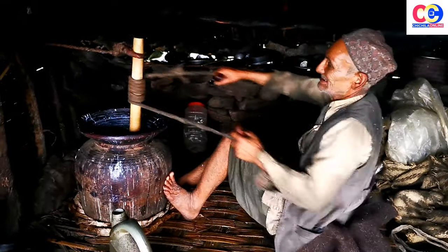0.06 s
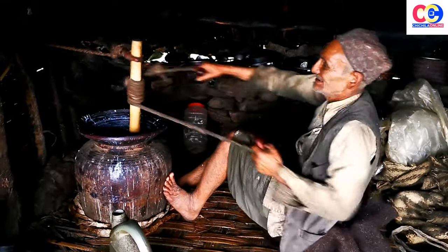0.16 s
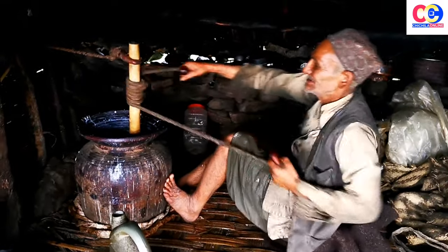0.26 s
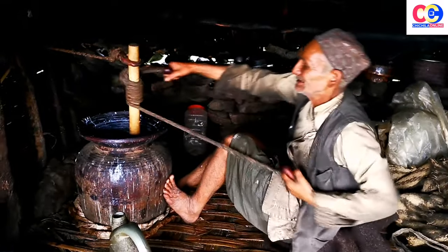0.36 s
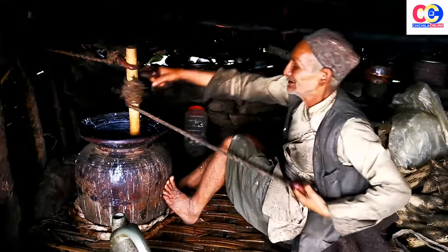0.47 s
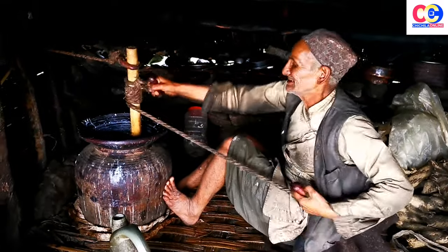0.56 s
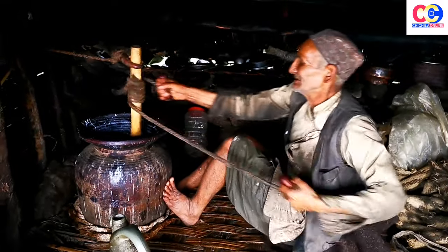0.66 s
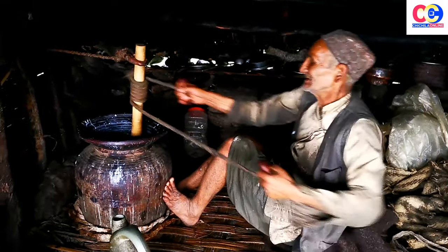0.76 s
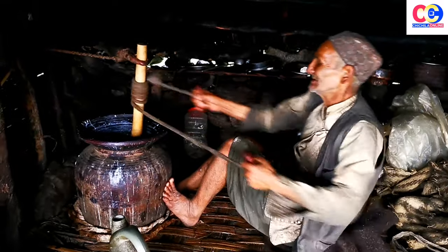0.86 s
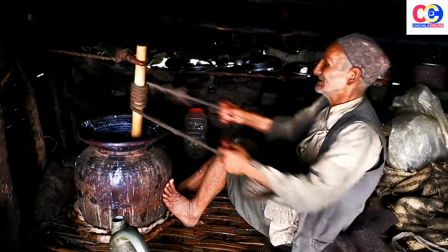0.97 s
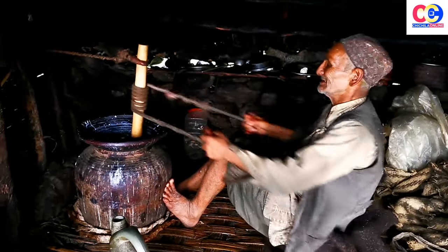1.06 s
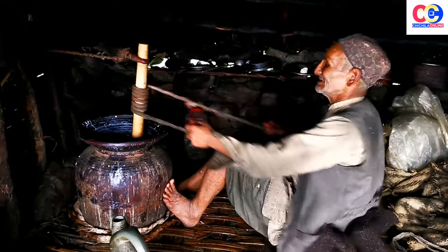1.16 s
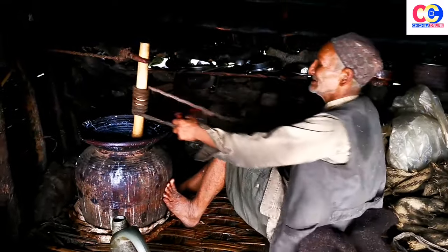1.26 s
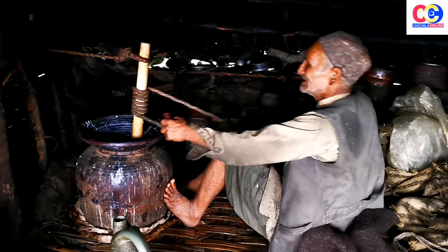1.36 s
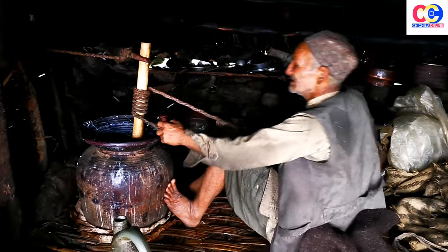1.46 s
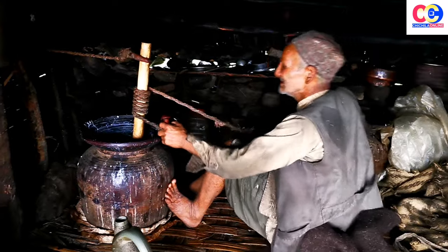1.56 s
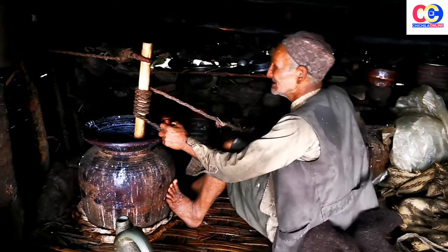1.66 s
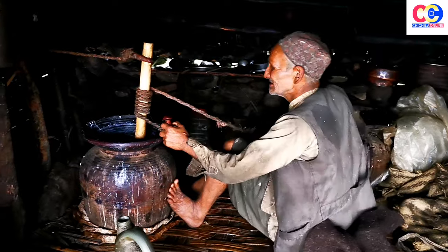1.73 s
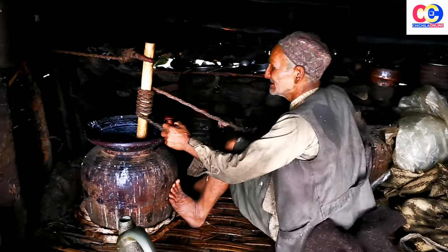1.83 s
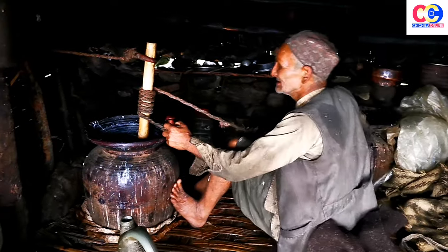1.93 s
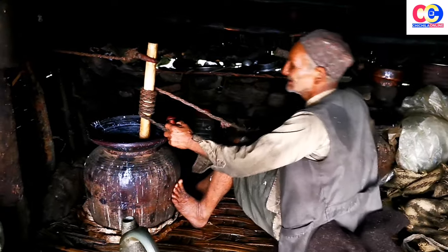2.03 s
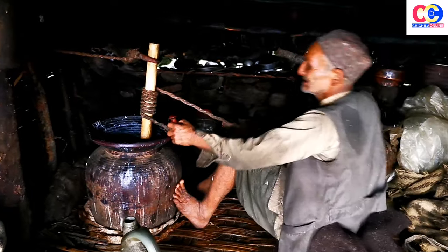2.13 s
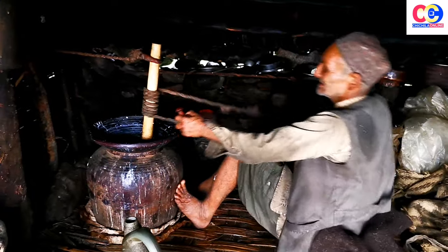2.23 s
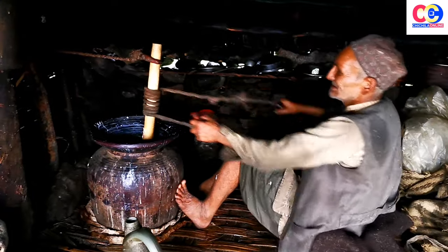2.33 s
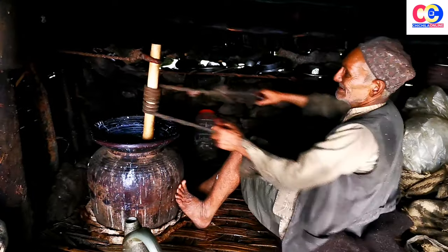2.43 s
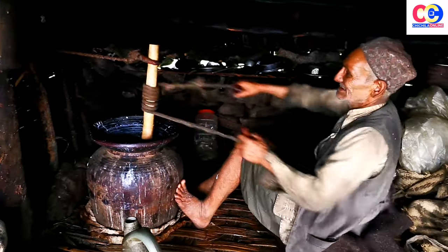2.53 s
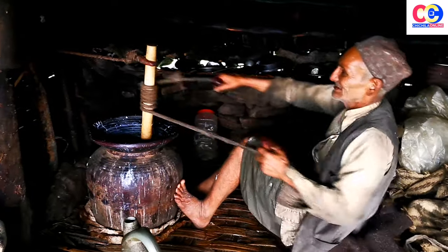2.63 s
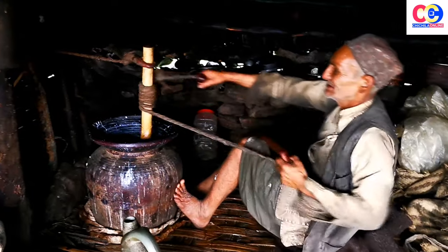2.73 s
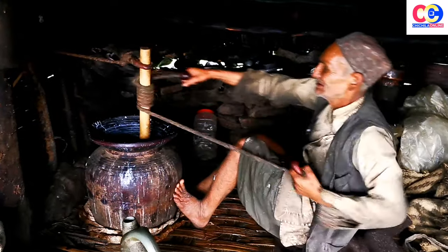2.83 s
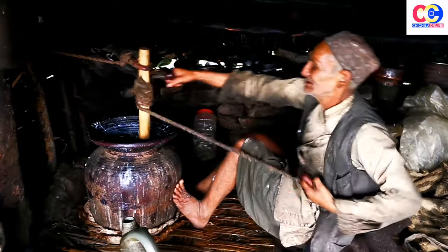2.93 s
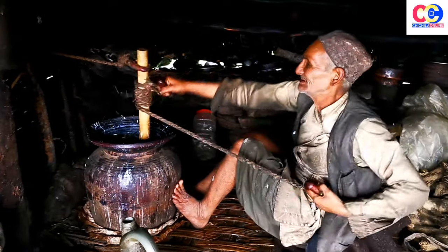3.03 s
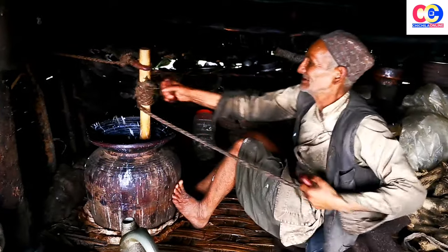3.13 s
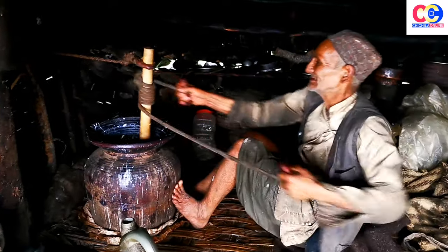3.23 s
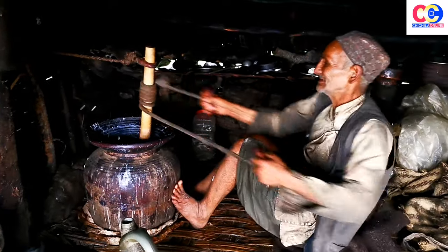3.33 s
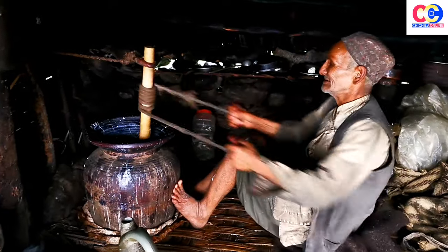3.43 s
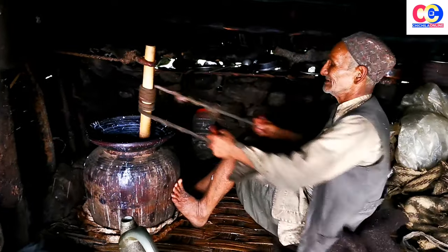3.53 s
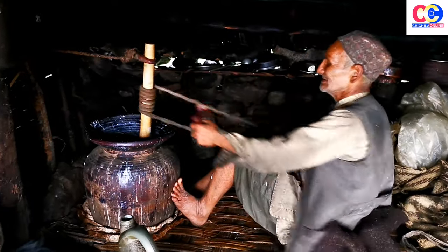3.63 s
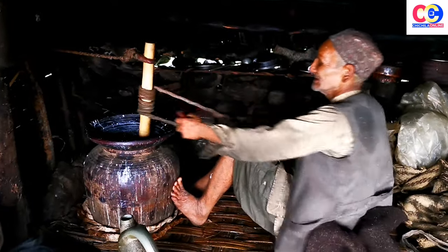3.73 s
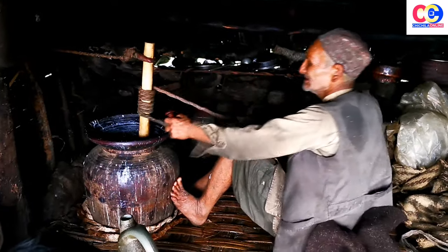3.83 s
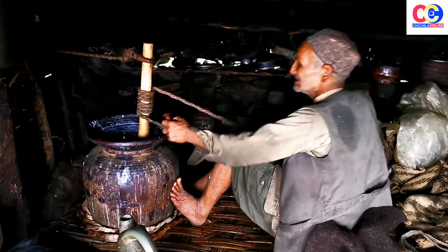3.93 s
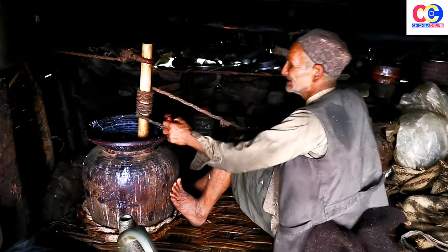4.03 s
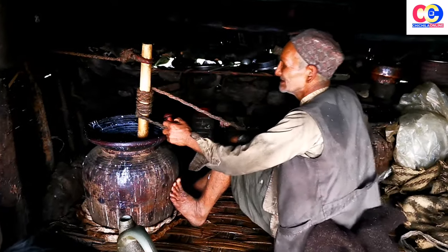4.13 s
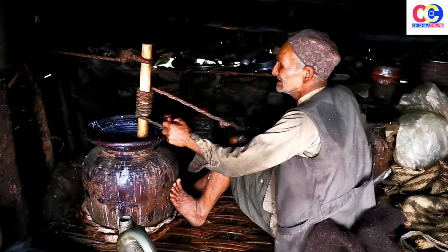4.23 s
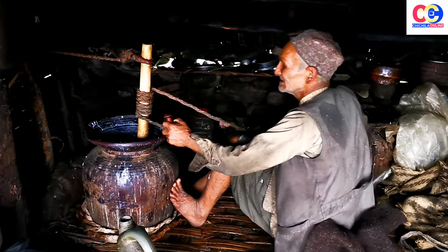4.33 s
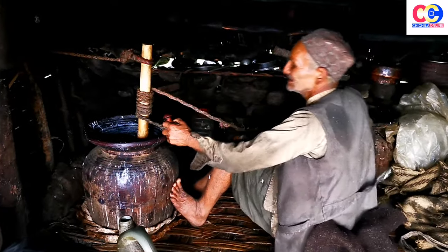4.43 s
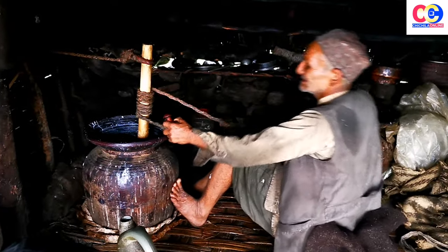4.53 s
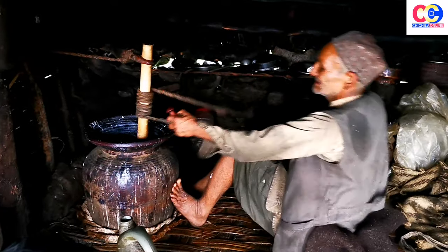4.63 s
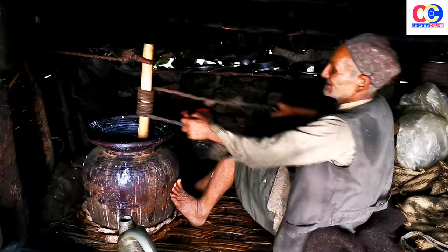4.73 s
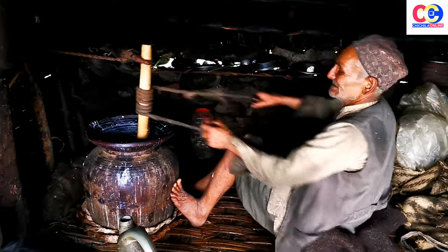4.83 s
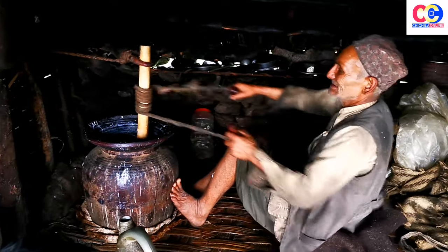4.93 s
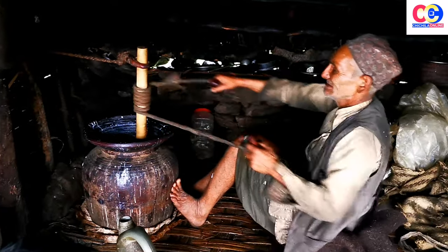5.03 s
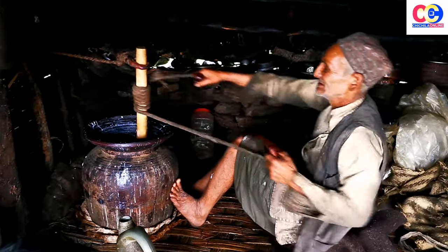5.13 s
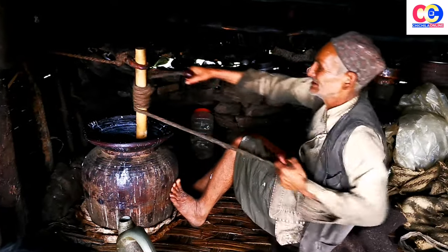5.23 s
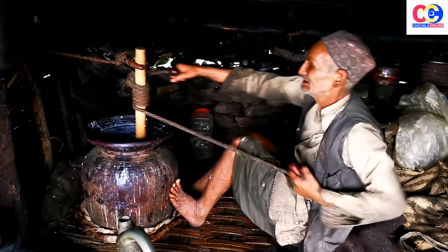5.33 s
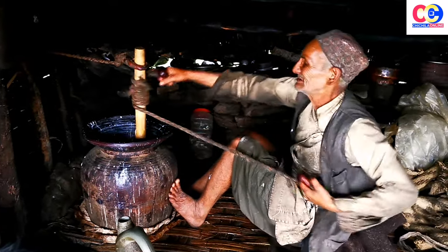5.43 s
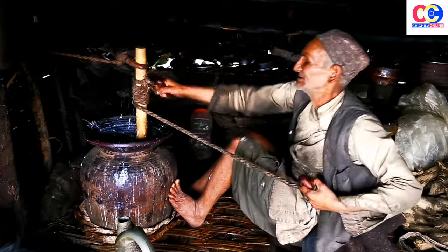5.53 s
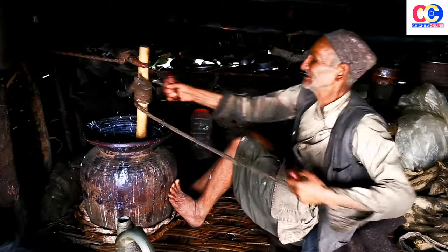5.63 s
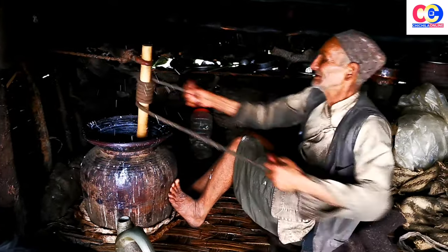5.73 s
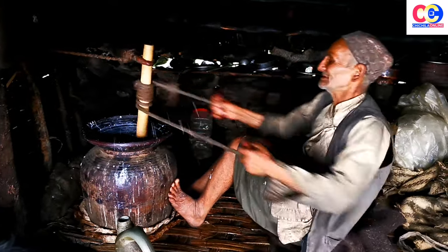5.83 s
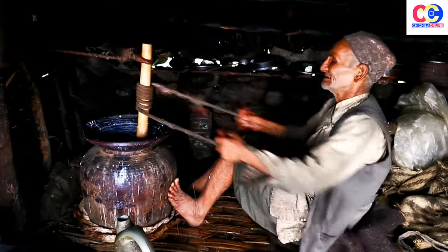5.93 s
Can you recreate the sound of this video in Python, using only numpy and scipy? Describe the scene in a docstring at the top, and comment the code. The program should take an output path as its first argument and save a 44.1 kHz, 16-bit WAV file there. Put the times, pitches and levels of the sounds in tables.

```python
"""A slap and a burst of gurgling open the scene: a rope-spun wooden paddle churns curd in a big clay pot.
It works in surges with rests between, inside a quiet shed. Air pockets are short sine bubbles that ring the
air in the pot; slaps and spray are shaped, patchy noise; the rocking and thuds are low bubbles; drops are clicks
with a short ring. Close microphones hear it from the left, with a thin whistle and the shed's hum and hiss behind."""
import sys
import numpy as np
from scipy import signal
from scipy.fft import rfft, irfft, next_fast_len
from scipy.io import wavfile
from scipy.ndimage import uniform_filter1d

SR = 44100
rng = np.random.default_rng(int(sys.argv[2]) if len(sys.argv) > 2 else 0)


def unload_audio(sound):
    """Save the sound as a 16-bit wav file, at the path given as the first command line argument."""
    columns = np.transpose(np.atleast_2d(sound))
    # keep every value between -1 and 1, then stretch to whole-number steps
    steps = np.round(np.clip(columns, -1, 1) * 32767)
    wavfile.write(sys.argv[1], SR, steps.astype(np.int16))


N = 264211


def gain_of(db):
    """Turns decibels into a factor."""
    return 10 ** (np.asarray(db) / 20)


def evened(x):
    """Scales a sound to rms 1."""
    return x / np.sqrt(np.mean(x ** 2) + 1e-20)


def add(mix, s, sound):
    """Mixes a sound in at s seconds."""
    part = mix[max(round(s * SR), 0):][:len(sound)]
    part += sound[:len(part)]


def colour(x, points, share=1):
    """Filters by a curve of (f/Hz, level/dB) points, of which share is applied."""
    size = next_fast_len(x.shape[-1])
    f, db = np.transpose(points)
    hz = np.fft.rfftfreq(size, 1 / SR)
    curve_db = np.interp(np.log(hz + 1), np.log(f + 1), db)
    return irfft(rfft(x, size) * gain_of(share * curve_db), size)[..., :x.shape[-1]]


def ring(x, modes):
    """Adds up resonances (f/Hz, width/Hz, level/dB), neighbours in opposite phase."""
    out = np.zeros(len(x))
    for k, (hz, width, db) in enumerate(modes):
        sign = (-1) ** k
        out += sign * gain_of(db) * signal.lfilter(*signal.iirpeak(hz, hz / width, SR), x)
    return out


def bubble(hz, length, glide, phase, rounded=1):
    """A pocket of air: a sine with a soft start, a peak near 1 and a pitch that glides up (down if glide < 0)."""
    u = np.arange(round(5 * length * SR) + 2) / SR / length  # time counted in lengths
    swell = (np.e * 3 * u * np.exp(-3 * u)) ** rounded
    cycles = hz * length * u * (1 + glide * u)
    return swell * np.sin(2 * np.pi * (cycles + phase))


def grains(lo_hz, hi_hz, per_s, cycles, spread_db, count, glide=0.013):
    """A swarm of bubbles of many sizes, a few of them loud; thick curd hardly lets their pitch rise."""
    out = np.zeros(N)
    for hz in np.geomspace(lo_hz, hi_hz, count):
        starts = rng.random(N) < per_s / count / SR
        train = starts * gain_of(spread_db * np.minimum(rng.exponential(1, N), 4))
        grain = bubble(hz, cycles / hz, glide, rng.random()) * np.sqrt(hz)
        out += signal.oaconvolve(train, grain)[:N]
    return evened(out)


def spread(shape, apart):
    """Noise from a wide surface: a part that both microphones share and a part of their own."""
    shared, left, right = rng.standard_normal((3, *shape))
    return shared + apart * np.array([left, right])


def mottled(x, patchy_db, flutter_db):
    """Curd breaks into blobs: patches of the spectrum, narrow and wide, swell for a few hundredths of a second."""
    z = signal.stft(x, nperseg=512, noverlap=384)[2]
    fine, wide = rng.standard_normal((2, *z.shape[1:]))
    fine = evened(uniform_filter1d(uniform_filter1d(fine, size=3, axis=0), size=6, axis=1))
    wide = evened(uniform_filter1d(uniform_filter1d(wide, size=24, axis=0), size=8, axis=1))
    field = gain_of(patchy_db * fine + flutter_db * wide)
    return signal.istft(z * evened(field), nperseg=512, noverlap=384)[1][:, :x.shape[1]]


# pulls on the rope: [t/s at full spin, level/dB, paddle starts t/s before, full spin lasts t/s,
# curd swings back after t/s, paddle stops after t/s, push on the pot level/dB]
ROPE_PULLS = [(0.08, -2, .2, 0.053, 0.37, 0.52, 0), (0.96, -0.5, 0.24, 0.13, 0.33, 0.48, 2),
              (2.553, -2, 0.15, 0.074, 0.32, 0.5, -3), (3.411, -1.5, 0.15, 0.077, 0.52, 0.55, 5),
              (4.98, -2.5, 0.23, 0.054, 0.52, 0.57, 0.5), (5.848, 0.5, 0.17, 0.048, .35, .5, 4.5)]
# how gurgle, spray and heave (one row each) follow a pull: [level/dB at full spin, start level/dB against full spin,
# rise dB per s, sag level/dB, sag t/s, swing-back level/dB, settling dB per s, share of the push 0-1]
LAYER_FOLLOWS = [(-32, -25, 222, 14.5, 0.16, 4.5, 111, 0.31), (-34, -17, 145, 20, 0.17, 0.5, 73, 0),
                 (-41, -17.5, 140, 10, 0.11, 6, 174, 0.85)]
SWING_S, START_DB_PER_S = 0.043, 408  # half-width of the swing-back (to 1/e), climb as the paddle starts


def surge(row):
    """Each pull stirs, spins the curd up, sags to a plateau, swings back once and settles; pulls add in power."""
    top_db, start_db, rise, sag_db, sag_s, swing_db, settle, share = LAYER_FOLLOWS[row]
    t, power = np.arange(0, N + 64, 64) / SR, 0
    for s, db, lead, hold, back, stop, push_db in ROPE_PULLS:
        u = t - s
        starting = start_db + START_DB_PER_S * np.minimum(u + lead, 0)
        level = np.maximum(rise * np.minimum(u, 0), starting)
        level -= sag_db * (1 - np.exp(-np.maximum(u - hold, 0) / max(sag_s, .01)))
        level += swing_db * np.exp(-((u - back) / SWING_S) ** 2)
        level -= settle * np.maximum(u - stop, 0)
        power = power + gain_of(level + db + share * push_db) ** 2
    return gain_of(top_db) * np.interp(np.arange(N) / SR, t, np.sqrt(power))


# big air pockets that collapse: [t/s, 3 ms after the start; level/dB before the pot; f/Hz; length t/s, swell peaks at 1/3]
BIG_POCKETS = [(0.079, -27.5, 275, 0.013), (0.083, -27.5, 1072, 0.021), (0.116, -24.5, 323, 0.024),
               (0.147, -16.5, 433, 0.0089), (0.215, -25, 340, 0.01), (0.265, -33.5, 335, 0.024),
               (0.388, -32, 413, 0.014), (0.441, -31.5, 335, 0.032), (0.508, -21, 478, 0.0088),
               (0.555, -36.5, 336, 0.02), (0.645, -26, 355, 0.024), (0.787, -36.5, 345, 0.03),
               (0.882, -37, 456, 0.059), (0.93, -29.5, 317, 0.02), (1.068, -21.5, 559, 0.011),
               (1.145, -26, 432, 0.028), (1.181, -20.5, 343, 0.023), (1.357, -35.5, 576, 0.012),
               (1.393, -23.5, 343, 0.022), (1.454, -25.5, 355, .012), (1.546, -46.5, 520, 0.012),
               (2.162, -54, 970, 0.0064), (2.408, -36.5, 1006, 0.013), (2.492, -33.5, 430, 0.045),
               (2.494, -30, 1544, 0.023), (2.577, -32, 634, 0.014), (2.631, -21.5, 544, 0.014),
               (2.642, -20, 326, 0.027), (2.683, -31, 336, 0.038), (2.728, -26.5, 658, 0.017),
               (2.782, -25, 933, 0.013), (2.933, -25.5, 341, 0.015), (2.937, -29.5, 1040, 0.021),
               (3.045, -24, 328, 0.015), (3.092, -44, 895, 0.025), (3.271, -25, 328, 0.0091),
               (3.325, -36.5, 660, 0.01), (3.389, -27.5, 276, 0.041), (3.416, -26, 251, 0.015),
               (3.722, -33.5, 960, 0.01), (3.828, -24.5, 482, 0.011), (3.889, -31.5, 352, 0.033),
               (3.941, -23, 328, 0.025), (3.986, -40.5, 923, 0.021), (4.045, -41.5, 906, 0.013),
               (4.086, -45, 708, 0.014), (4.089, -45, 1280, 0.022), (4.092, -43, 2130, 0.011),
               (4.135, -49, 347, 0.03), (4.177, -43, 347, 0.014), (4.464, -42, 367, 0.0067),
               (4.526, -48, 362, 0.013), (4.593, -43, 1025, 0.0075), (4.712, -49, 740, 0.012),
               (4.721, -44.5, 700, .01), (4.762, -47, 780, .01), (4.774, -41.5, 600, 0.0095),
               (4.912, -41, 1110, 0.0088), (4.94, -32.5, 714, 0.018), (5.01, -22.5, 345, 0.011),
               (5.039, -27, 450, 0.013), (5.084, -31.5, 310.4, 0.054), (5.13, -26.5, 573, 0.016),
               (5.156, -31, 457, 0.042), (5.207, -32.5, 600, 0.014), (5.256, -29, 443, 0.033),
               (5.331, -25.5, 335, 0.013), (5.453, -36, 595, .02), (5.474, -30, 365, 0.035),
               (5.515, -25, 369, 0.023), (5.616, -40.5, 320, 0.031), (5.754, -30, 367, 0.024),
               (5.863, -30.5, 1022, 0.035), (5.929, -25.5, 448, 0.017)]
# resonances of the air in the pot: [f/Hz, width/Hz, level/dB]
POT_AIR = [(315, 44, -1.5), (448.1, 15.6, 3), (532, 46, -6.5), (602, 87, -6), (717.7, 34, -6),
           (910, 30, -11.5), (1020, 77, -14), (1270, 11.4, -14.5), (1520, 18, -24)]
PLOP_SHARE, PLOP_GLIDE = 0.26, 0.04
POCKET_ROUND = 1.6  # above 1 the big pockets swell and fade more evenly


def gurgle():
    """Many small pockets and the listed big ones, heard through the air in the pot."""
    swarm = grains(229.5, 1760, 1200, 2.7, spread_db=5, count=24)
    # rounder pockets that ring and rise
    plops = grains(452.7, 1522, 70, 10.5, spread_db=4.0, count=16, glide=PLOP_GLIDE)
    big, slop, t = np.zeros(N), np.zeros(N), np.arange(SR // 5) / SR
    noises = rng.standard_normal((len(BIG_POCKETS), len(t)))
    for (s, db, hz, length), noise in zip(BIG_POCKETS, noises):
        length = np.clip(length, .004, .08)
        pocket = bubble(hz, length, 0.021, 0.19 * noise[0], POCKET_ROUND)
        add(big, s - .003, gain_of(db) * pocket)
        # curd falls into the hole
        fall = noise * (1 - np.exp(-t / 0.0016)) * np.exp(-t / (0.65 * length))
        add(slop, s - .001, gain_of(db) * fall)
    slop = signal.sosfilt(signal.butter(2, [500, 2200], "band", fs=SR, output="sos"), slop)
    small = evened(ring(swarm, POT_AIR) + 0.073 * swarm) + PLOP_SHARE * plops
    pockets = 0.89 * big + 0.1 * ring(big, POT_AIR)
    return surge(row=0) * small + pockets + 9.3 * ring(slop, POT_AIR)


# tone colour of thrown curd, also used in slaps and drops: [f/Hz, level/dB per Hz]
SPRAY_COLOUR = [(470, -14.5), (800, -12.5), (1000, -8), (1350, -17), (2030, -10), (2540, -9.5),
                (3410, -10.5), (6270, -13.5), (8130, -13.5), (14400, -36), (15500, -42)]
SPLATS_PER_S, SPLAT_T60_S, SPLAT_DB = 40, .12, -12  # t60: time to fall by 60 dB


def spray():
    """Fine fizz with small ringing blobs in it, swelling briefly with uneven splats."""
    shared, left, right = (grains(892.7, 8290, 500, 18, spread_db=3, count=20) for _ in range(3))
    blobs = shared + np.array([left, right])
    fizz = mottled(spread((N,), apart=5.3) + blobs, patchy_db=4, flutter_db=2.2)
    t = np.arange(SR // 8) / SR
    thrown = (rng.random(N) < SPLATS_PER_S / SR) * rng.exponential(1, N)
    swell = gain_of(-60 * t / SPLAT_T60_S) * (1 - np.exp(-t / .006))
    splats = signal.oaconvolve(thrown, swell)[:N]
    fizz = fizz * (1 + gain_of(SPLAT_DB) * evened(splats))
    return surge(row=1) * evened(colour(fizz, SPRAY_COLOUR))


# waves that slap the wall: [t/s, 2 ms after the start; peak level/dB; wet body f/Hz; t/s to fall by 60 dB;
# body level/dB over the spray]
WALL_SLAPS = [(0.0152, -28, 1130, 0.72, -18), (0.207, -24.5, 7150, 0.038, -6),
              (0.27, -32.5, 3060, 0.062, -21), (0.3185, -27, 2080, 0.034, 1),
              (0.3684, -26.5, 5150, 0.17, -10), (0.4363, -28, 980, 0.42, -38),
              (0.5569, -27, 3600, 0.11, -17), (0.605, -36.5, 1280, 0.041, -1),
              (0.665, -33, 1280, 0.083, -22), (0.748, -29.5, 1860, 0.099, -12),
              (0.9195, -20.5, 1020, 0.38, 1), (0.9923, -35, 1040, 0.28, 12), (1.308, -25.5, 980, 0.047, 3),
              (1.3889, -24.5, 2430, 0.08, -6), (1.493, -36, 6840, 0.1, 8), (1.572, -36, 2410, 0.13, 34),
              (2.162, -34, 1120, 0.087, -3.5), (2.3768, -35.5, 1710, 0.54, -10),
              (2.4929, -21, 1620, 0.27, 6.5), (2.6877, -24, 1000, 0.05, 19), (2.7806, -26, 1010, 0.1, -18),
              (2.8768, -32.5, 3380, 0.092, 0), (2.927, -24, 1030, 0.12, -24), (3.04, -20.5, 2600, 0.12, -1),
              (3.2648, -24, 2510, 0.18, -5), (3.392, -20, 1140, 0.66, 3), (3.5523, -28.5, 2190, 0.086, 8),
              (3.645, -55, 1080, 0.029, -22), (3.692, -36, 6350, 0.074, 16), (3.776, -45, 6050, 0.1, -7),
              (3.827, -32.5, 5070, 0.065, -16), (3.879, -34.5, 7450, 0.043, 16),
              (3.918, -35, 5450, 0.31, -15), (3.936, -27, 2900, 0.18, -2.5),
              (4.047, -45.5, 7500, 0.062, 14), (4.089, -39, 2200, 0.13, 13), (4.144, -50, 5900, 0.11, -10),
              (4.1749, -41, 1300, 0.11, -14), (4.4595, -45.5, 2250, 0.074, -3.5),
              (4.5028, -49, 2330, 0.3, -3), (4.5874, -38, 1010, 0.16, -13),
              (4.7208, -45.5, 7800, 0.051, -1), (4.763, -38.5, 2800, 0.56, -16),
              (4.78, -32, 3200, 0.065, 14), (4.799, -28.5, 8350, 0.058, 2), (4.927, -30.5, 1000, 0.22, 0.5),
              (5.2917, -29.5, 8300, 0.096, 23), (5.3301, -29.5, 3140, 0.054, 1),
              (5.387, -27, 970, 0.071, -24), (5.484, -29, 2440, 0.2, 1), (5.5195, -29.5, 940, 0.18, -0.5),
              (5.711, -30, 2600, 0.17, -30), (5.9258, -26, 1270, 0.13, 2.5)]


def slaps():
    """Each slap is a ragged puff of spray with a fast rise and a wet, coloured body around one pitch."""
    out, t = np.zeros((N, 2)), np.arange(SR // 5) / SR  # every puff ends after 0.2 s
    rags = mottled(spread((len(WALL_SLAPS) * len(t),), apart=1.2), patchy_db=4, flutter_db=2.5)
    for (s, db, hz, t60, body_db), noise in zip(WALL_SLAPS, np.split(rags, len(WALL_SLAPS), axis=1)):
        peak = signal.iirpeak(hz, 2.1, SR)
        body = evened(signal.lfilter(*peak, signal.lfilter(*peak, noise)))
        puff = evened(colour(noise, SPRAY_COLOUR)) + gain_of(body_db) * body
        puff *= gain_of(-60 * t / max(t60, .01)) * (1 - np.exp(-t / 0.0038))
        add(out, s - .002, gain_of(db) * puff.T / abs(puff).max())
    return out.T


# the pot knocks on its mat: [t/s, 5 ms after the start; level/dB; f/Hz at the start]
POT_THUDS = [(0.157, -40.5, 132), (0.375, -39, 82.6), (0.88, -35.5, 142.7), (1.304, -35, 87),
             (2.62, -41.5, 120), (2.873, -36, 92), (3.512, -35.5, 63.3), (5.386, -37, 84),
             (5.479, -41, 151), (5.793, -37, 105)]
# resonances of the pot rocking on its mat: [f/Hz, width/Hz, level/dB]
POT_ON_MAT = [(60.4, 6.7, -34), (84.4, 7.9, 3.5), (109, 30, 2), (160, 62, 6.5)]


def heave():
    """Lumpy pushes of the curd rock the pot; the mat under it answers unevenly left and right."""
    pushes, left, right = (grains(45, 210, 90, 1.6, spread_db=2.2, count=8) for _ in range(3))
    rock = np.array([ring(pushes + 0.077 * own, POT_ON_MAT) + 0.15 * pushes for own in (left, right)])
    knocks = np.zeros(N)
    for (s, db, hz), phase in zip(POT_THUDS, rng.random(len(POT_THUDS))):
        add(knocks, s - .005, gain_of(db) * bubble(hz, 0.064, -0.039, phase))
    return surge(row=2) * evened(rock) + knocks


# single drops: [t/s, peak level/dB, ring f/Hz, brightest f/Hz of the click, click share 0-1 (at least 0.2 is used)]
DROPS = [(0.302, -19.5, 2320, 5260, 0.96), (0.3118, -17, 2420, 2000, 0.28), (1.569, -36, 1890, 6900, 0.2),
         (1.773, -36, 1850, 7550, 0.76), (1.818, -41, 1830, 7900, 0.53), (1.828, -31.5, 1370, 7740, 0.78),
         (1.8577, -36.5, 1750, 5630, 0.81), (1.917, -39, 1610, 5930, 0.93), (1.9675, -49, 2240, 5900, 1),
         (2.022, -42, 3040, 5730, 0.43), (2.093, -43, 2730, 8100, 0.67), (2.1172, -38, 2500, 8800, 0.88),
         (2.6636, -16, 2490, 1700, 0.4), (4.2273, -40, 2120, 1200, 0.62), (4.7853, -21, 2870, 5000, 0.98),
         (4.8487, -26.5, 2800, 4500, 0.67)]


def ticks():
    """Each drop is a tiny bright click with a short ring that sags in pitch."""
    out, t = np.zeros(N), np.arange(600) / SR
    for (s, db, hz, bright_hz, share), noise in zip(DROPS, rng.standard_normal((len(DROPS), len(t)))):
        bright = [(bright_hz, 2200, 0)]
        click = 0.3 * evened(colour(noise, SPRAY_COLOUR)) + evened(ring(ring(noise, bright), bright))
        click = evened(click) * gain_of(-60 * t / 0.0026)
        tone = np.sin(2 * np.pi * hz * t * (1 - 15 * t))
        tone *= (1 - np.exp(-t / .0005)) * gain_of(-60 * t / .0065)
        share = np.clip(share, .2, 1)
        drop = share * click + (1 - share) * 2 * tone
        add(out, s, gain_of(db) * drop / abs(drop).max())
    return out


# faint, far whistle: [start t/s, end t/s, f/Hz, level/dB (rms before the fades)]
FAR_WHISTLE = (1.915, 2.02, 2210, -68)


def whistle():
    """A thin, breathy tone from outside: a sine plus noise narrowed to the same pitch."""
    start, end, hz, db = FAR_WHISTLE
    air = rng.standard_normal(round((end - start) * SR))
    sine = np.sin(2 * np.pi * hz * np.arange(len(air)) / SR)
    tone = evened(sine + .6 * evened(ring(air, [(hz, 40, 0)])))
    out = np.zeros(N)
    add(out, start, gain_of(db) * tone * signal.windows.tukey(len(air), .5))
    return out


def shed(x, t60, lo_hz):
    """Scattered treble reflections off pot rim and clutter, different at each microphone."""
    at = np.arange(40, SR // 3, 22)  # one reflection in every 22 samples
    taps = np.zeros((2, SR // 3 + 22))
    sizes = rng.choice([-1., 1.], (2, len(at))) * gain_of(-60 * at / SR / t60)
    np.put_along_axis(taps, at + rng.integers(0, 22, sizes.shape), sizes, 1)
    high = signal.sosfilt(signal.butter(1, lo_hz, "high", fs=SR, output="sos"), x)
    return signal.oaconvolve(high[None], taps / np.linalg.norm(taps[0]), axes=1)[:, :N]


# tone colour of the quiet shed: [f/Hz, level/dB per Hz]
SHED_AIR = [(18, -58), (30, 4), (95, 1.5), (164, 1.5), (208, -0.5), (249, 6), (292, 1), (575, -8.5),
            (921, -12), (2000, -11.5), (4090, -18), (8000, -22.5), (10500, -31), (12000, -38), (15500, -62)]
AIR_DB = -65  # rms


def still_air():
    """Low hum and hiss of the quiet shed: coloured noise, partly shared by both microphones."""
    return gain_of(AIR_DB) * evened(colour(spread((N,), apart=1.0), SHED_AIR))


# how much louder the left microphone hears the pot than the right: [f/Hz, level/dB]
LEFT_OVER_RIGHT = [(60, 5), (120, 1), (240, 2.5), (480, 3.5), (950, 2.5), (1890, -2.5), (3770, -1),
                   (7520, 1), (15000, -0.5)]


def scene():
    """The pot reaches the right microphone six samples after the left, with a different tone colour."""
    small, drops = gurgle() + whistle(), ticks()
    reflections = gain_of(-3.5) * shed(small + 0.45 * drops, t60=0.15, lo_hz=830)
    pot = small + drops + heave() + spray() + slaps() + reflections
    left = colour(pot[0], LEFT_OVER_RIGHT, share=.5)
    right = colour(np.roll(pot[1], shift=6), LEFT_OVER_RIGHT, share=-.5)
    return np.array([left, right]) + still_air()


def band_limit(x):
    """A steep low-pass at the top of the band."""
    return signal.sosfilt(signal.butter(12, 15870, fs=SR, output="sos"), x)


def record(dry):
    """A steep filter takes away the treble above about 15.3 kHz."""
    edge = signal.firwin(301, 15300, window=("kaiser", 8), fs=SR)
    mix = signal.oaconvolve(dry, edge[None], "same")
    return band_limit(mix)


dry = scene()
out = record(dry)
unload_audio(out)
```